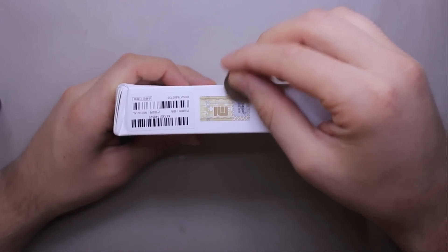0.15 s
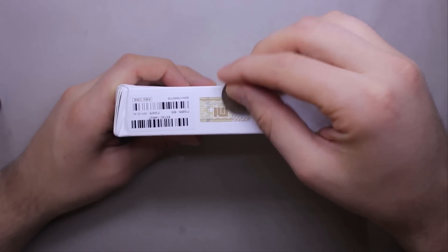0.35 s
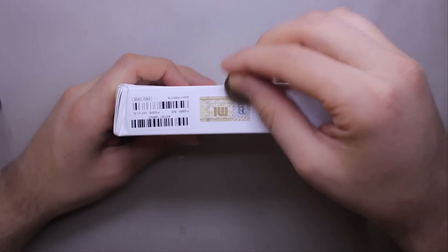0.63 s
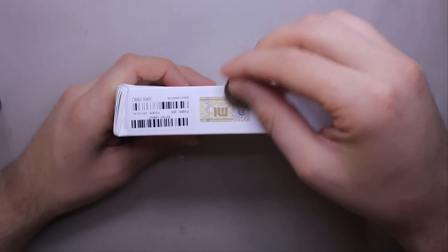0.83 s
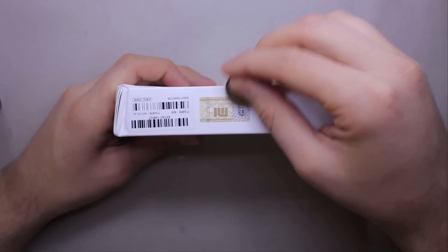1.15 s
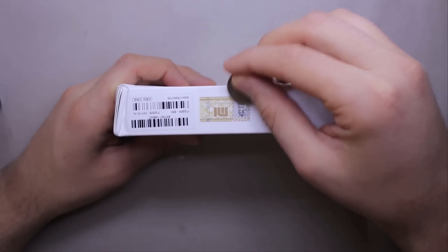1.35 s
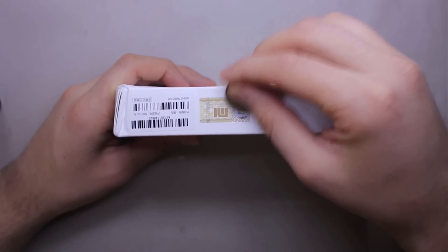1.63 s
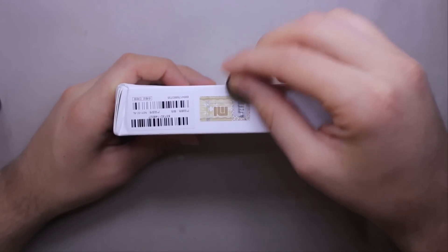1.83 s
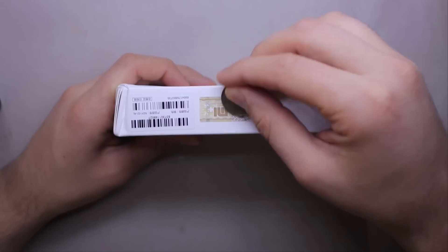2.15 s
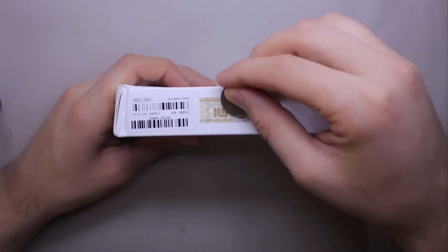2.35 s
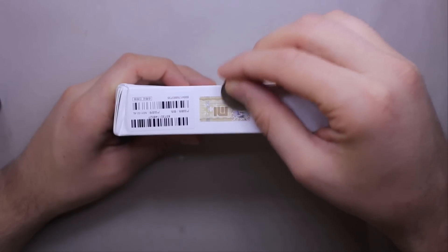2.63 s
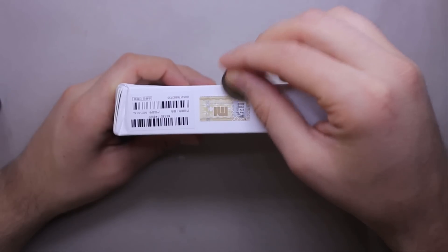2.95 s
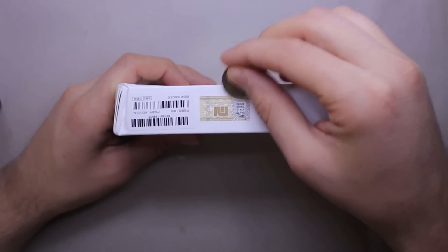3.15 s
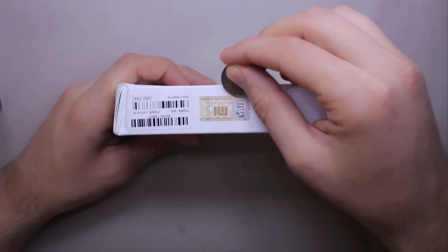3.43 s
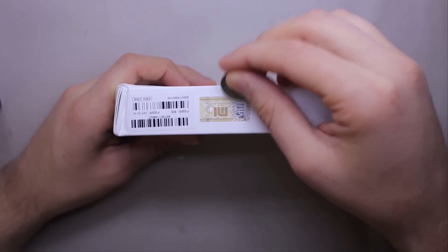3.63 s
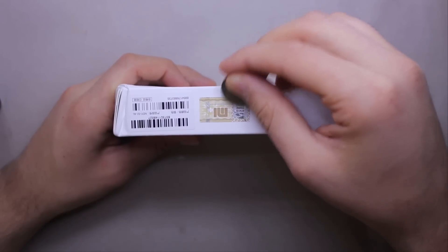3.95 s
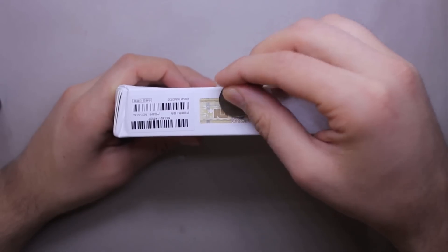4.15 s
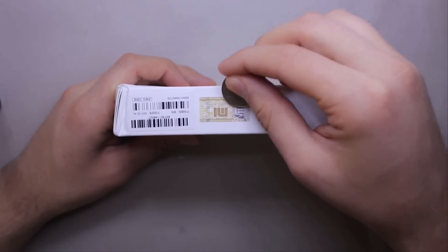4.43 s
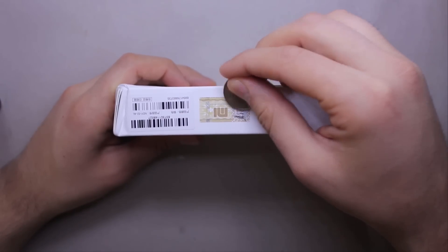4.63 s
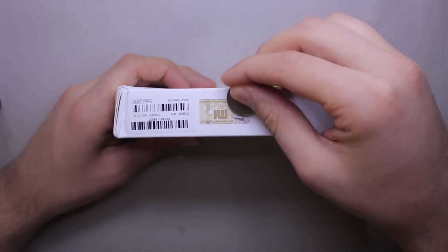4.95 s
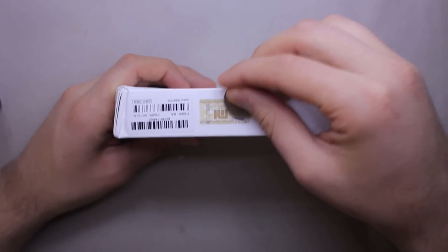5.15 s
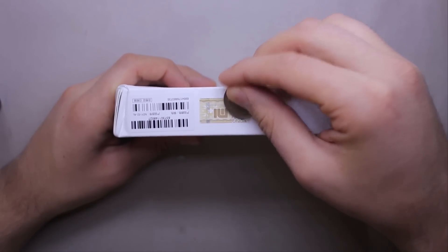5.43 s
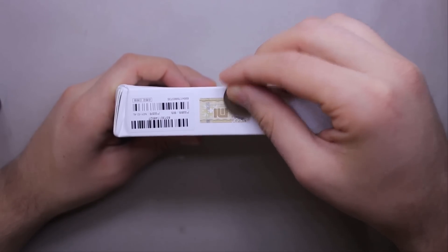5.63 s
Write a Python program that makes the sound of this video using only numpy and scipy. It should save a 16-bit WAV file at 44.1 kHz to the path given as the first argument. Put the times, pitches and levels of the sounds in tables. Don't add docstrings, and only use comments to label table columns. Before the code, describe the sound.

Fast, dry, gritty to-and-fro scratching of a coin on a small boxy carton, interrupted by a sharp knock and brief clatter.

```python
import sys
import numpy as np
from scipy import signal
from scipy.fft import rfft, irfft
from scipy.io import wavfile
from scipy.ndimage import uniform_filter1d

SR = 44100
rng = np.random.default_rng(int(sys.argv[2]) if len(sys.argv) > 2 else 0)


def wrap_up_sound(samples):
    columns = np.atleast_2d(samples).T
    tamed = np.clip(columns, -1, 1)
    steps = np.round(tamed * 32767).astype(np.int16)
    wavfile.write(sys.argv[1], SR, steps)


def volts_from_db(level):
    exponent = np.asarray(level, float) / 20
    return 10 ** exponent


N = 255720


def colour(x, spectrum):
    hz, db = np.transpose(spectrum)
    f = np.fft.rfftfreq(len(x), 1 / SR) + 1
    gain = volts_from_db(np.interp(np.log(f), np.log(hz), db))
    return irfft(rfft(x) * gain, len(x))


def unit(x):
    return x / np.sqrt(np.sum(x ** 2))


def ring(modes, senses):
    t = np.arange(SR // 5) / SR
    out = np.zeros(len(t))
    for sense, (hz, width_hz, db) in zip(senses, modes):
        decay = np.exp(-np.pi * width_hz * t)
        out += sense * volts_from_db(db) * np.sqrt(width_hz) * decay * np.sin(2 * np.pi * hz * t)
    return unit(out)


def walk(rate_hz):
    k = int(SR / rate_hz)
    held = np.repeat(rng.standard_normal(N // k + 1), k)
    return 1.21 * uniform_filter1d(uniform_filter1d(held, k), k)[:N]


def slips(scatter_db):
    x = rng.standard_normal(N) * volts_from_db(scatter_db * rng.exponential(size=N).clip(0, 5))
    return x / x.std()


# start t/s, length/s, lid level/dB, brightness/dB (edge and grit re lid), catch/dB
PUSHES = [(0.1602, 0.05, -41.5, -1.5, -11), (0.4033, 0.042, -37, -2.5, 1), (0.65, 0.039, -41.5, -1.5, 11),
          (0.8526, 0.048, -37.5, -2, 3), (1.0811, 0.045, -39.5, -1.5, 5), (1.3122, 0.041, -41, 1, 9),
          (1.5298, 0.05, -38.5, -0.6, 7), (1.7484, 0.066, -41, 0.5, 2), (1.9827, 0.054, -41, 4, 0.0),
          (2.2109, 0.056, -40, -0.5, -3), (2.4352, 0.054, -40.5, 2.5, 0.0), (2.6678, 0.054, -38.5, -2, 7),
          (2.9003, 0.05, -38, -2.2, 0.0), (3.1354, 0.056, -38, -2.5, 0.0), (3.3943, 0.056, -39, -3, 4)]
PULLS = [(-0.01, 0.058, -39, -12, 0.0), (0.2529, 0.056, -35.5, -8, 7.5), (0.496, 0.046, -34, -9.5, 6),
         (0.724, 0.042, -31.5, -6, -8), (0.9501, 0.04, -33.5, -6, -2.5), (1.1768, 0.044, -34.5, -4.5, 5.5),
         (1.3949, 0.037, -32.5, -6.5, 6.5), (1.447, 0.056, -46.5, -8.5, -6), (1.6402, 0.047, -35, -4.5, 3),
         (1.8527, 0.051, -33, -5.6, 0.0), (2.0767, 0.051, -33.5, -5, 5), (2.3024, 0.05, -34.5, -6, 4),
         (2.5296, 0.052, -33.5, -8, 10), (2.759, 0.046, -33.5, -5.5, 7), (2.984, 0.049, -35, -6.5, 6.5),
         (3.231, 0.06, -38, -7.5, 11)]
QUICK_PUSHES = [(3.6417, 0.04, -41, 1.5, 3), (3.891, 0.033, -37.5, 1, 9), (4.088, 0.038, -36.5, -3, -10),
                (4.2183, 0.038, -42, -1.5, -2), (4.4217, 0.036, -42.5, 2.5, -9),
                (4.629, 0.035, -41, -4, -4), (4.8104, 0.038, -41, -4.5, 10), (5.0665, 0.042, -43.0, -4, -4),
                (5.2845, 0.039, -41, 0.9, 4), (5.4864, 0.044, -42, 3, 5), (5.6781, 0.06, -41, 3.5, 7)]
QUICK_PULLS = [(3.604, 0.011, -38, 1.5, -8), (3.779, 0.013, -44, -6, 7), (3.9709, 0.035, -37.5, -4, 5),
               (4.058, 0.048, -40, -12.5, 2), (4.2913, 0.028, -33.5, -7, 0.0),
               (4.4941, 0.038, -34.5, -9, 6), (4.7025, 0.037, -36, -13.5, 0.0),
               (4.8914, 0.046, -40.5, -18, 0.0), (4.96, 0.048, -51.5, -16.5, -7),
               (5.1499, 0.033, -34.5, -6.5, 5.5), (5.3643, 0.045, -35.5, -7, -1),
               (5.5605, 0.047, -35, -7, 2), (5.7599, 0.062, -33.5, -6.5, 6.5)]
# peak, rise, fall [shares of length], level/dB re stroke
PUSH_SHAPE = [(0.62, 0.58, 0.43, 4.5), (0.52, 0.65, 0.85, -2), (0.83, 0.67, 0.38, 7),
              (.55, 0.48, 0.58, 2.5)]
PULL_SHAPE = [(0.42, 0.52, 0.94, 1.5), (0.69, 0.87, 0.81, -3), (0.32, 0.3, 0.88, 3), (0.44, 0.32, 0.85, 1)]
QUICK_PUSH_SHAPE = [(0.63, 0.62, 0.48, 5), (0.63, 0.83, 0.82, -2.5), (0.66, .55, 0.53, 4.5),
                    (0.59, 0.51, 0.54, 2.5)]
QUICK_PULL_SHAPE = [(0.54, 0.72, 0.57, 2), (0.5, 0.78, 1, -6), (0.69, 0.42, 0.48, 7), (0.74, 0.68, 0.44, 3)]
PUSH_BITE_DB = (3, -2, -6, -8)
PULL_BITE_DB = (9, 1.5, 6, 1)


def strokes():
    for rows, shape, bite_db in ((PUSHES, PUSH_SHAPE, PUSH_BITE_DB),
                                 (PULLS, PULL_SHAPE, PULL_BITE_DB),
                                 (QUICK_PUSHES, QUICK_PUSH_SHAPE, PUSH_BITE_DB),
                                 (QUICK_PULLS, QUICK_PULL_SHAPE, PULL_BITE_DB)):
        for start_s, length_s, db, bright_db, catch_db in rows:
            parts_db = db + bright_db * np.array([0, -0.31, 1.07, 0.94])
            yield start_s, length_s, parts_db, np.array(shape), np.array(bite_db) + catch_db


def pressure(squareness=3.07):
    t, power = np.arange(N) / SR, np.zeros((4, N))
    for start_s, length_s, parts_db, shape, _ in strokes():
        near = slice(max(int((start_s - .1) * SR), 0), int((start_s + .2) * SR))
        peak, rise, fall, db = shape.T[:, :, None]
        u = (t[near] - start_s) / length_s - peak
        swell = np.exp(-np.abs(u / np.where(u < 0, rise, fall)) ** squareness)
        power[:, near] += (volts_from_db(parts_db[:, None] + db) * swell) ** 2
    return np.sqrt(power)


def bites(t60_s=0.025, rise_s=0.0017, stick_s=0.0028, stick_db=-9):
    jolts, free = np.zeros((4, N + SR)), np.ones(N)
    t = np.arange(SR // 10) / SR
    jolt = volts_from_db(-60 * t / t60_s) * (1 - np.exp(-t / rise_s))
    hold = np.linspace(1, volts_from_db(stick_db), int(stick_s * SR))
    for start_s, _, parts_db, _, bite_db in strokes():
        i = int(start_s * SR)
        if i > len(hold):
            jolts[:, i:i + len(t)] += volts_from_db(parts_db + bite_db + 2.5)[:, None] * jolt
            free[i - len(hold):i] = hold
    return jolts[:, :N], free


def ring_panel(drive, modes, wander_db):
    weights = unit(np.array([volts_from_db(db) for _, _, db in modes]))
    out = np.zeros(N)
    for i, (weight, mode) in enumerate(zip(weights, modes)):
        wander = volts_from_db(wander_db * (walk(28) - 0.06 * wander_db))
        out += weight * signal.oaconvolve(drive * wander, ring([mode], [(-1.) ** i]))[:N]
    return out


# f/Hz, level/dB per Hz
FINE = [(4000, -33), (6000, -2.5), (9000, -5.5), (12500, -10.5), (16000, -18)]


def fine_crackle(grit, level_db=-21.5, ref_db=-37.5, power=0.34):
    speed = np.sqrt(uniform_filter1d(grit ** 2, size=700) + 1e-14) / volts_from_db(ref_db)
    pulse = unit(np.roll(colour(signal.unit_impulse(512), FINE), 64))
    crackle = grit * np.sign(rng.standard_normal(N)) * speed ** power
    return volts_from_db(level_db) * signal.oaconvolve(crackle, pulse)[64:N + 64]


# f/Hz, width/Hz, level/dB
LID = [(860, 38, -4.5), (916, 45, -7), (1000, 75, -10), (1066, 55, -8.5), (1137, 52, -1), (1189, 58, 0),
       (1278, 60, -1), (1345, 65, -3), (1430, 75, -9)]
CAVITY = [(217, 3.4, -18), (300, 28.7, -7.5), (377.4, 41.6, -2.5), (475.3, 40, 0), (551, 58, 1),
          (605.4, 36, 1.5), (662, 51, -6), (764, 32, -5)]
EDGE = [(1667, 110, -13), (1964, 110, -4), (2057, 99, 0.5), (2181, 80, -10), (2334, 66, -7.5),
        (2520, 330, -11.5)]
COIN = [(3313, 67, 2.5), (3780, 32, -1.5), (4339, 106, 1), (4816, 470, 3.5), (5616, 53, -4.5),
        (6180, 170, -11), (7506, 110, -12.5), (11030, 450, -15)]
# f/Hz, level/dB per Hz
GRIT = [(1000, -27), (1600, -3), (2600, -1), (4500, -3.5), (5300, -45), (6500, -17), (9000, -28),
        (12500, -25), (16000, -38)]


def scrape():
    judder = volts_from_db(0.8 * walk(90) + 2.4 * walk(500))
    judder /= np.sqrt(np.mean(judder ** 2))
    jolts, free = bites()
    force = np.hypot(pressure() * free, jolts) * judder
    common = slips(3.06)
    noise = np.array([0.71 * common + 0.84 * slips(2.26) for _ in force])
    lid, cavity, edge, grit = force * noise
    panels = ring_panel(lid, LID, 1.66) + ring_panel(cavity, CAVITY, 1.8) + ring_panel(edge, EDGE, 2.1)
    coin = volts_from_db(-4.0) * ring_panel(grit, COIN, 3.1)
    pulse = unit(np.roll(colour(signal.unit_impulse(2048), GRIT), 128))
    crackle = volts_from_db(-1.0) * signal.fftconvolve(grit, pulse)[:N]
    return panels + coin + crackle + fine_crackle(grit)


# f/Hz, level/dB per Hz
HISS = [(20, -21), (36, -9.5), (50, -15), (80, -15.5), (125, -1.5), (200, -4.5), (300, -7), (1370, -8.5),
        (1600, -12), (2900, -16), (5400, -17), (10000, -22), (16000, -25)]


def hiss(level_db=-56, rumble_db=-63, rumble_hz=36):
    x = colour(rng.standard_normal(N), HISS)
    t = np.arange(N) / SR
    swell = np.exp(-((t - .95) / 0.17) ** 2)
    rumble = volts_from_db(rumble_db) * swell * np.sin(2 * np.pi * rumble_hz * t)
    return volts_from_db(level_db) * x / x.std() + rumble


# t/s, peak level/dB, f/Hz
THUMPS = [(0.041, -59, 227), (0.284, -46, 225), (0.577, -51.5, 221), (0.774, -48, 217), (1.009, -52.5, 124),
          (1.232, -46.5, 218), (1.457, -47, 208), (1.55, -46, 228), (1.684, -50, 220), (1.859, -57, 213),
          (1.999, -67, 126), (2.14, -41.5, 225), (2.349, -65, 131), (2.796, -49.5, 210), (3.025, -51, 153),
          (3.309, -56, 160), (3.594, -42.5, 187), (3.598, -50.5, 85.5), (3.89, -55, 86), (3.606, -41, 287),
          (3.776, -39, 300), (3.768, -43.5, 224), (3.884, -43, 230), (3.977, -48, 226), (4.339, -62, 226),
          (4.735, -54, 216), (5.421, -57, 139), (5.697, -51.5, 198)]


def thumps(rise_s=0.0055, t60_s=0.17):
    out, t = np.zeros(N + SR), np.arange(SR // 4) / SR
    for start_s, db, hz in THUMPS:
        envelope = (1 - np.exp(-t / rise_s)) * volts_from_db(db + 3.0 - 60 * t / t60_s)
        i = int(start_s * SR)
        out[i:i + len(t)] += envelope * np.sin(2 * np.pi * hz * t)
    return out[:N]


# t/s, lid peak level/dB, then cavity, edge, coin level/dB re lid
KNOCKS = [(0.2585, -17, 0, -7, 3), (0.7542, -23.5, -21, 10.5, -13), (1.958, -48.5, 1, 23.5, -5),
          (3.468, -3, -3.5, -3.5, -9), (3.5949, -14, -0.5, -19, -11), (3.6043, -11.5, 0, -0.5, 0.5),
          (3.7746, -8, -1.5, -8.5, -9.5), (3.891, -17.5, 5.5, 0, 6.5), (3.9852, -13, -4, -4, 0),
          (5.4038, -26.5, -7, 6, -2)]


def knocks(crack_db=9, crack_s=.004, rise_s=0.00075, contact_s=.000035):
    out, parts = np.zeros(N + SR), (LID, CAVITY, EDGE, COIN)
    t = np.arange(SR // 5) / SR
    flex = (1 + volts_from_db(crack_db) * np.exp(-t / crack_s)) * (1 - np.exp(-t / rise_s))
    push = np.exp(-np.arange(SR // 200) / SR / contact_s)
    push /= push.sum()
    spots = rng.standard_normal(size=(len(KNOCKS), 4, 9)) + 0.36
    for (start_s, db, *above_db), spot in zip(KNOCKS, spots):
        blow = np.zeros(len(t))
        for modes, g, part_db in zip(parts, spot, (0, *above_db)):
            r = flex * ring(modes, np.sign(g) * (.5 + np.abs(g)))
            blow += volts_from_db(db - 10.5 + part_db) * r / np.abs(r).max()
        blow = np.convolve(blow, push)
        i = int(start_s * SR)
        out[i:i + len(blow)] += blow
    return out[:N]


# t/s, peak level/dB, centre f/Hz, length/ms
TICKS = [(1.957, -32, 2400, 1.4), (3.468, -49, 7000, .9), (3.4685, -21, 760, 8.8), (3.7746, -28, 4500, .8),
         (3.5947, -28, 4670, 1.7), (3.744, -29.5, 4600, 1.3), (5.6386, -27.5, 3450, 2.1),
         (5.6415, -26.5, 3250, 2), (5.6514, -37, 3900, 1.4)]


def ticks():
    out, t = np.zeros(N), np.arange(1200) / SR
    for start_s, db, hz, ms in TICKS:
        band = [(hz / 4, -30), (hz / 2, -10), (hz, 0), (hz * 1.37, -4), (hz * 2.0, -14), (hz * 5.7, -34)]
        burst = colour(rng.standard_normal(len(t)), band) * np.exp(-1000 * t / ms)
        i = int(start_s * SR)
        out[i:i + len(t)] += volts_from_db(db) * burst / np.abs(burst).max()
    return out


def radiate(x, hz=270):
    return signal.sosfilt(signal.butter(3, hz, "high", fs=SR, output="sos"), x)


# f/Hz, level/dB per Hz
ROOM = [(100, -28), (300, -1), (1400, 6), (2000, -1.5), (3500, 0.5), (6000, -14), (16000, -22)]


def room(x, t60_s=.28, wet_db=-10, gap_s=0.001):
    t = np.arange(SR // 2) / SR
    tail = unit(rng.standard_normal(len(t)) * volts_from_db(-60 * t / t60_s) * np.clip(t / gap_s, 0, 1))
    return x + volts_from_db(wet_db) * signal.fftconvolve(x, colour(tail, ROOM))[:N]


def scene():
    box = radiate(scrape() + knocks() + ticks()) + thumps()
    return (room(box) + hiss())[None]


def top_cut(x):
    return signal.sosfilt(signal.butter(12, 16530, fs=SR, output="sos"), x)


def record(dry, top_hz=15740):
    low_pass = signal.ellip(10, .2, 60, top_hz, fs=SR, output="sos")
    mix = signal.sosfilt(low_pass, dry)
    return top_cut(mix)


dry = scene()
out = record(dry)
wrap_up_sound(out)
```